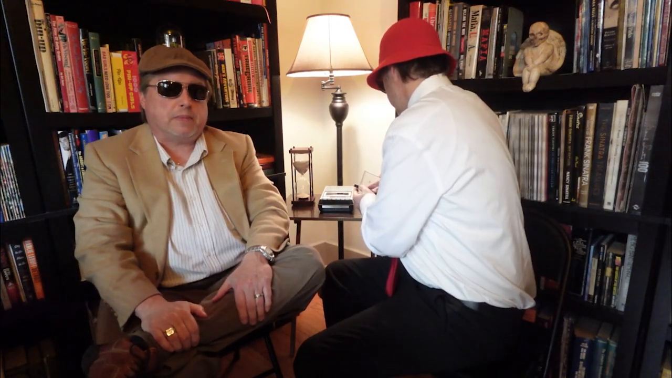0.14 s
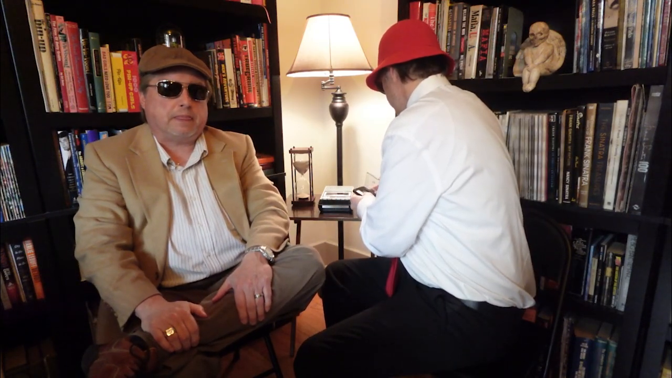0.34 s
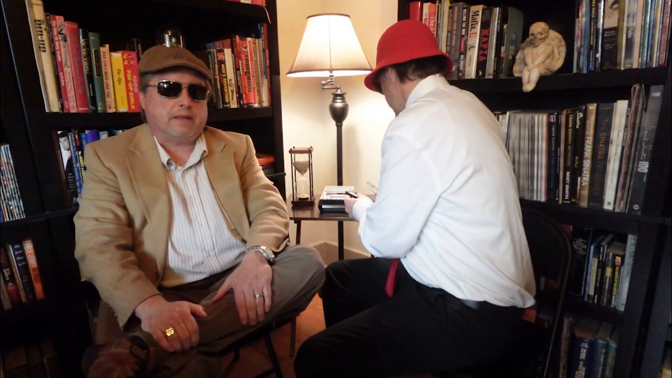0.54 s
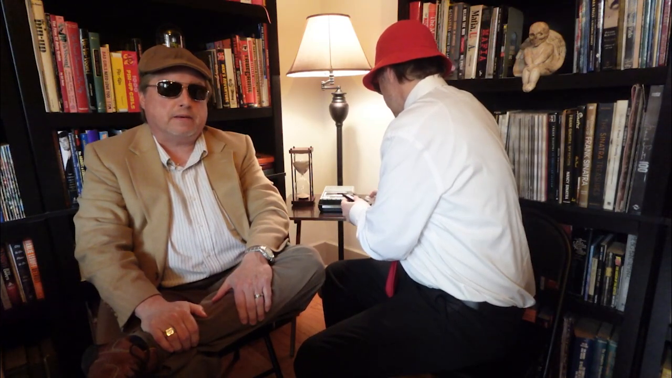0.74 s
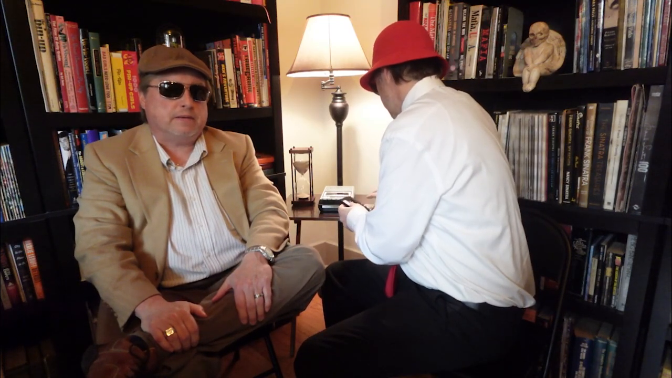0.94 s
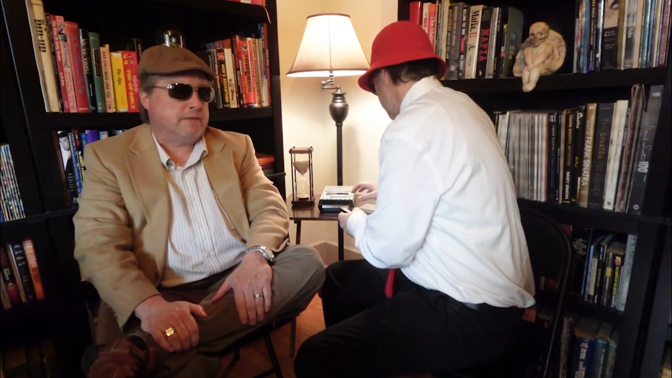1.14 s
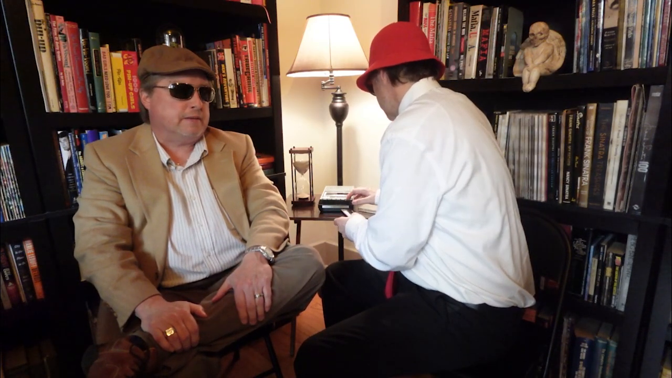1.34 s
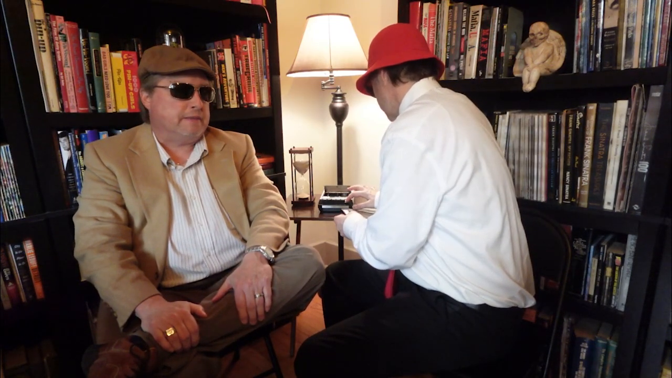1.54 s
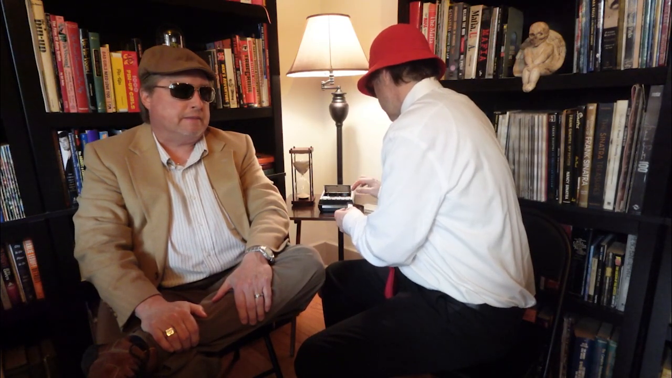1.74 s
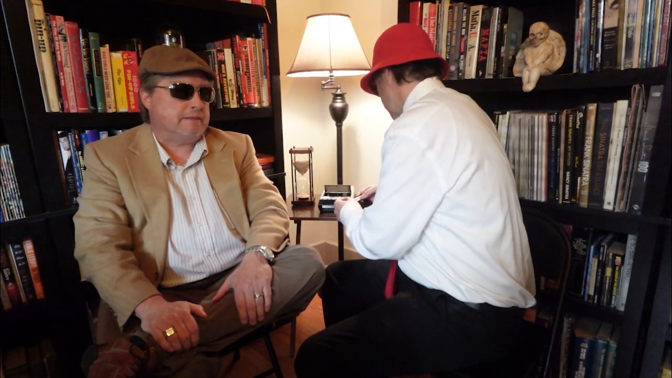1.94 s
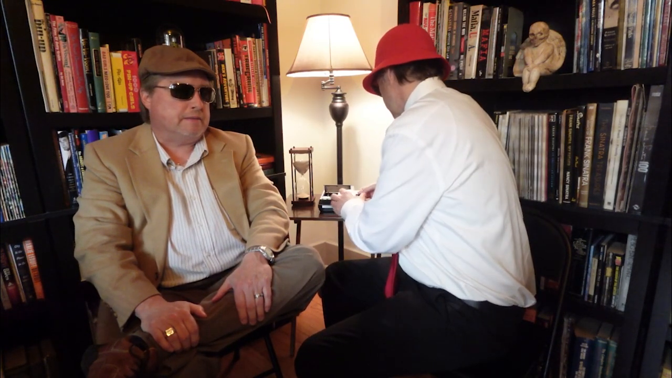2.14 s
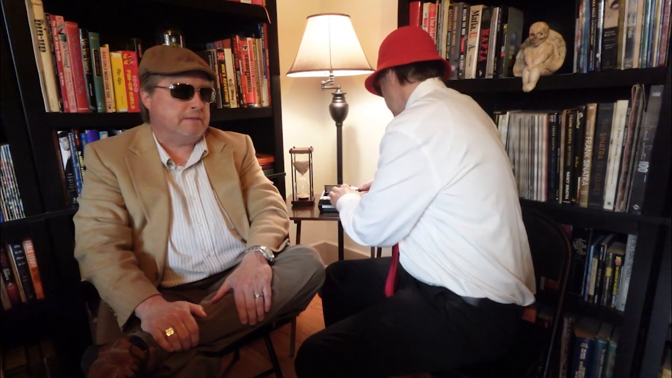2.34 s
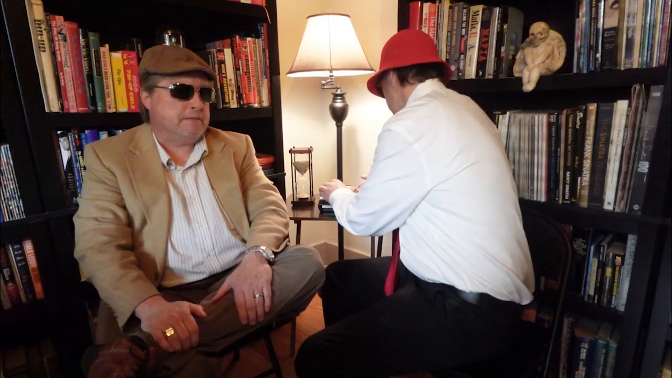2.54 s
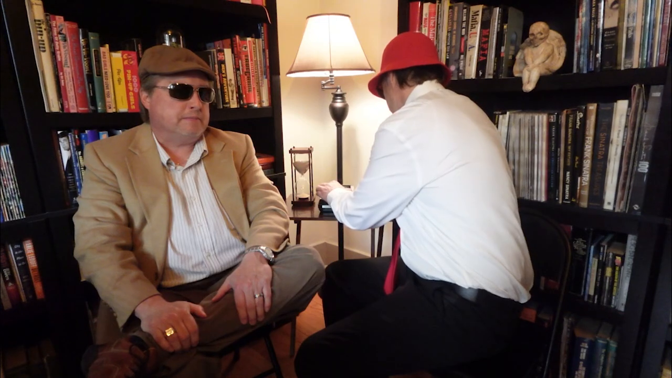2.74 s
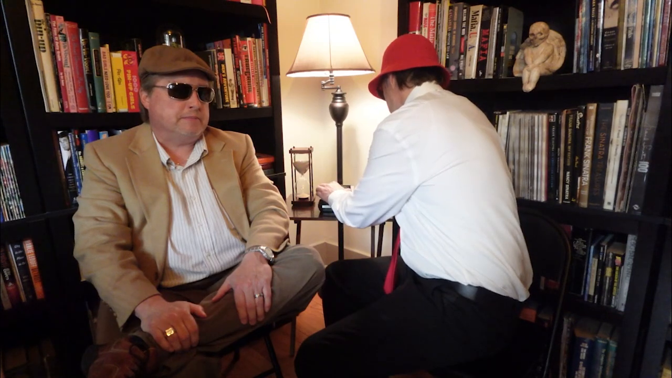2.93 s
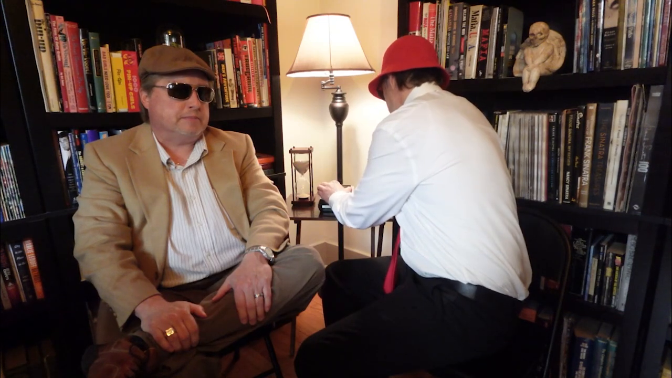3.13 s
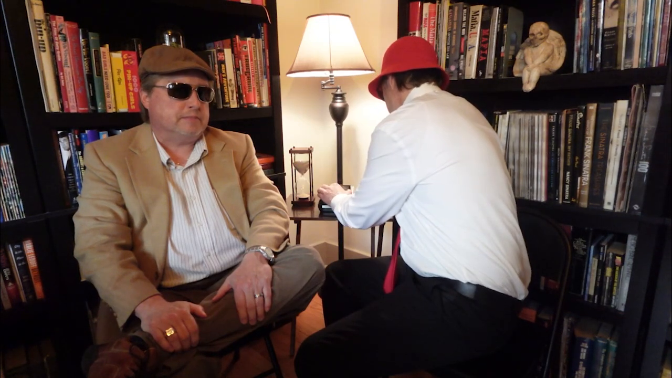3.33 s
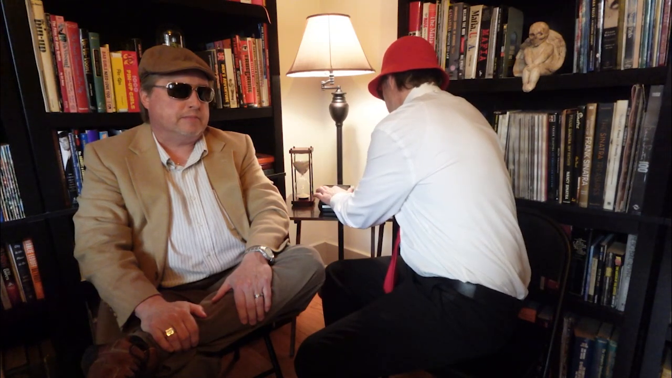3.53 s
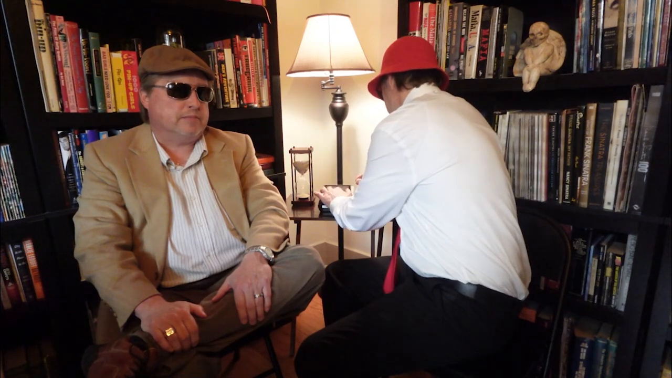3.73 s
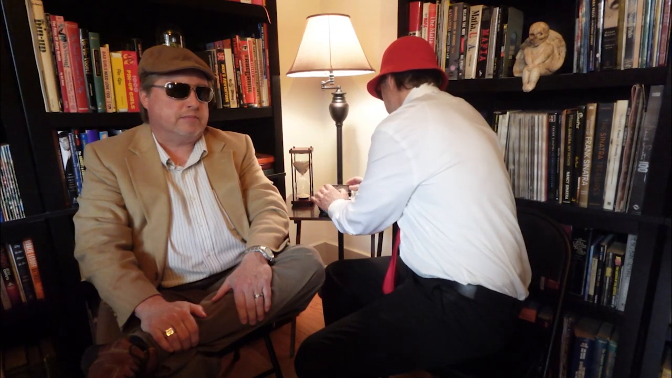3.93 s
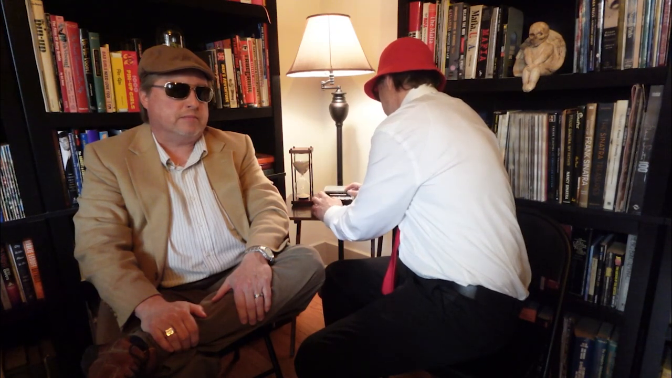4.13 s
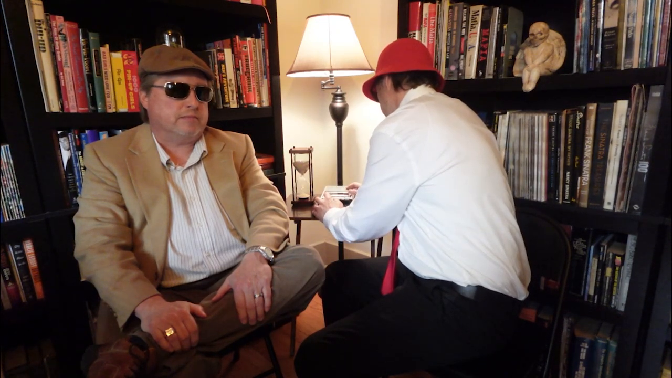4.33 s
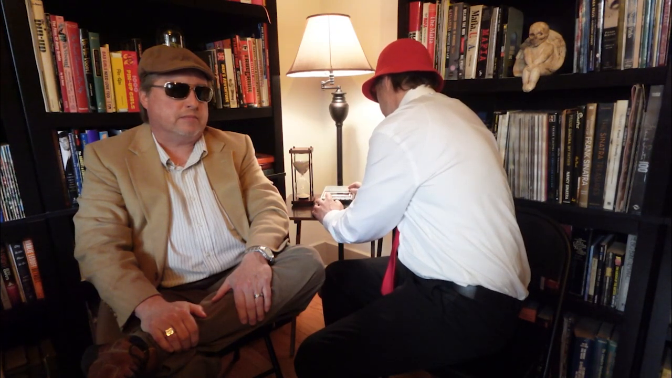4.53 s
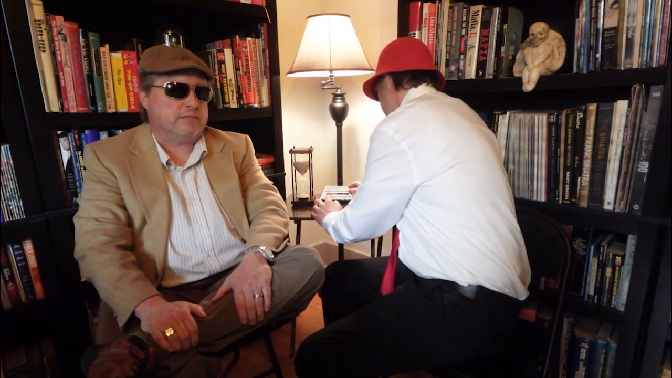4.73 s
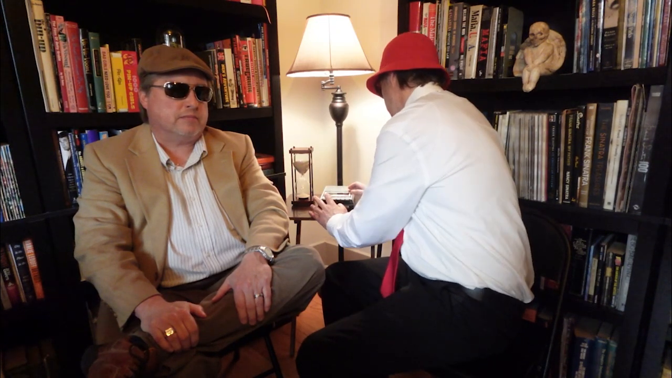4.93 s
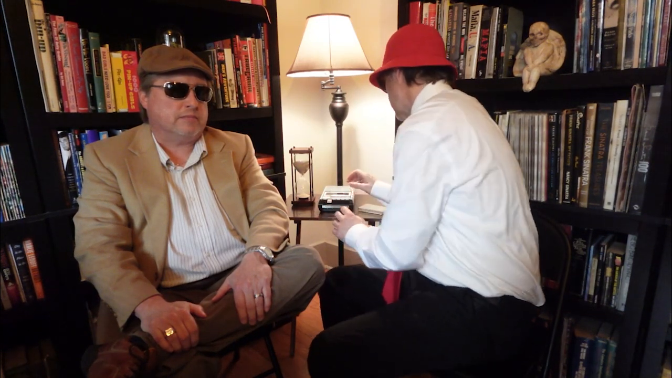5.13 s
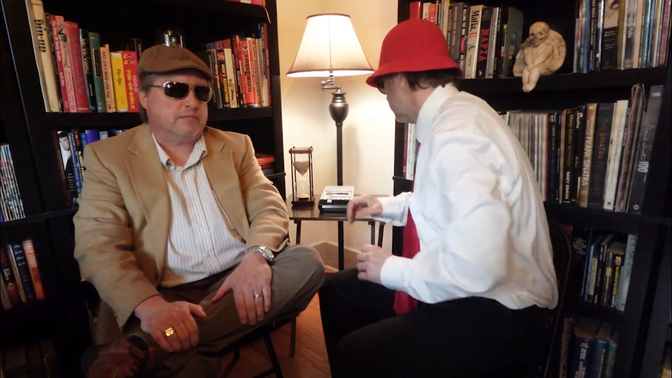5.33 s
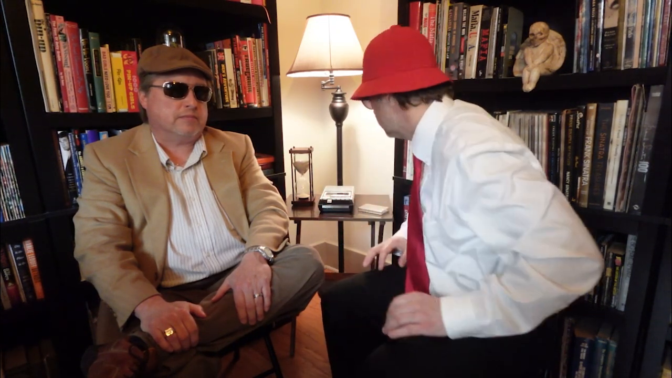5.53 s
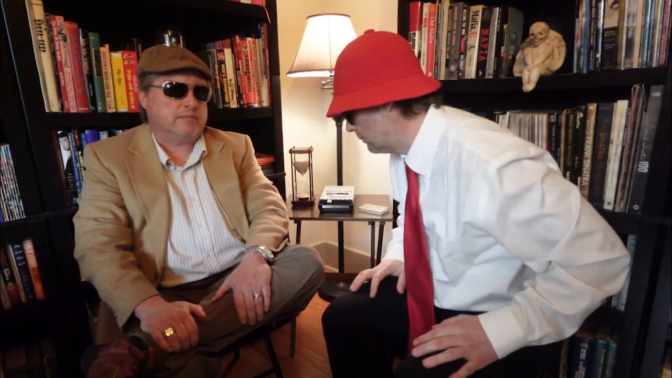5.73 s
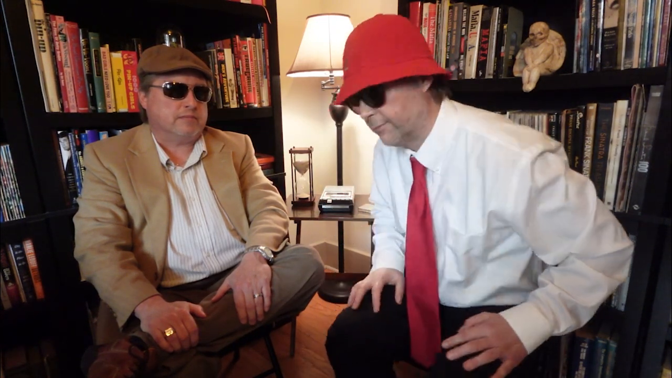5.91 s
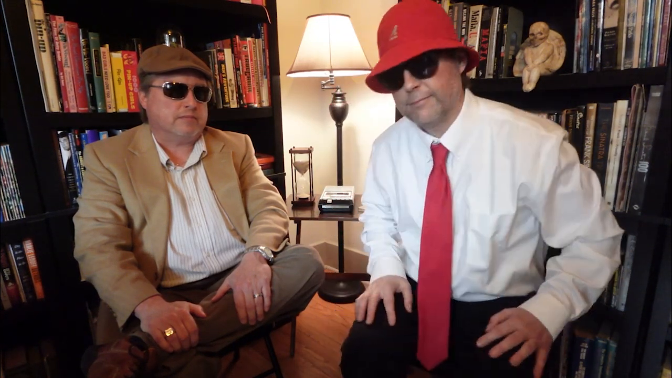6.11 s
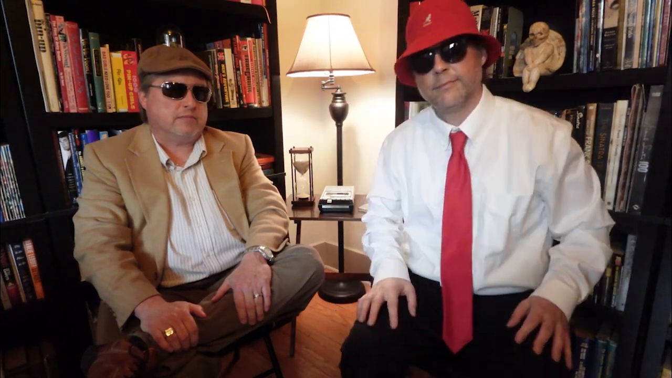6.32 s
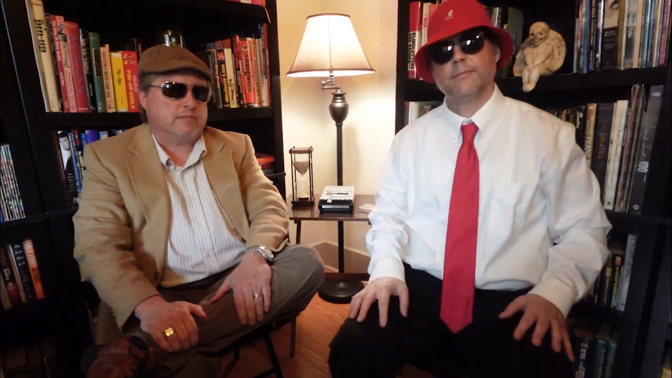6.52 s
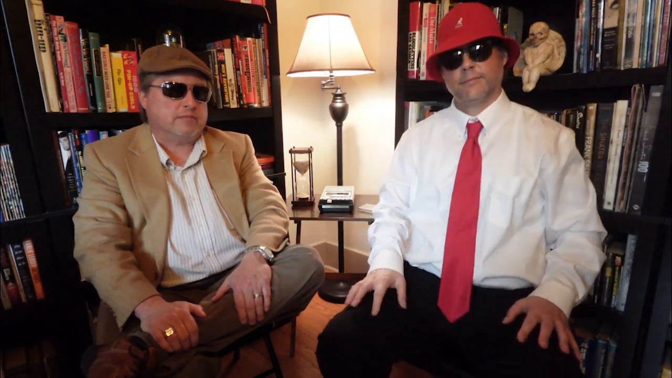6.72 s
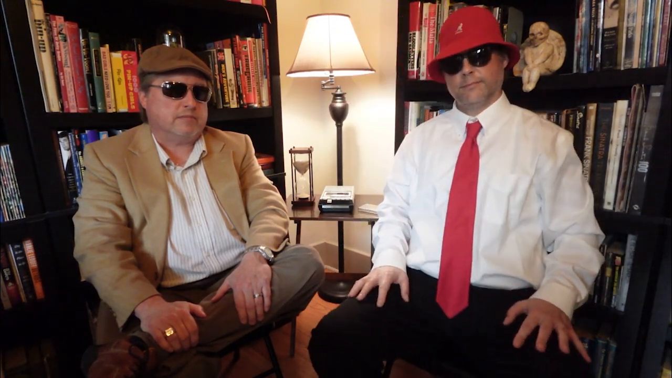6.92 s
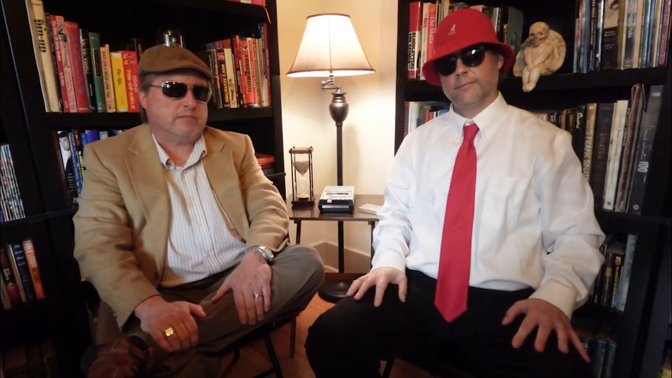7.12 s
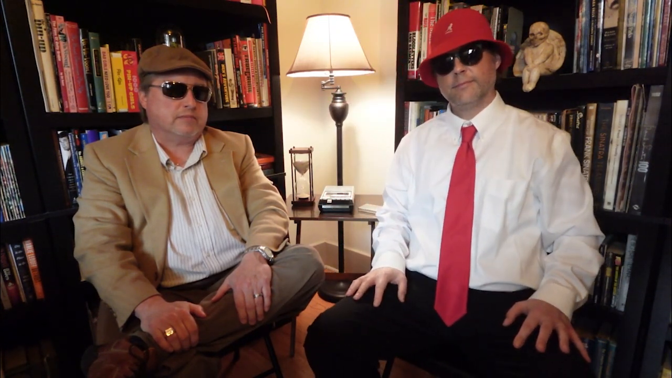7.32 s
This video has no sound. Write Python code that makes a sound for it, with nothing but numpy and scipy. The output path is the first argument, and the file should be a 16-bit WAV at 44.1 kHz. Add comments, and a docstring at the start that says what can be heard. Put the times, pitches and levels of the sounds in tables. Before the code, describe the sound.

A small furnished room with faint steady hiss and short reflections, heard closely in stereo. From 0 to 0.6 s a hard plastic cassette box gives light, irregular clicks and rattles, growing louder, with a sharp clack at 0.83 and another click at 1.0. At about 1.6 s the recorder's door opens with a loud, hollow double clack, and a bright tick follows at 1.74. From 1.9 to 3.4 s there are only faint taps and soft sleeve rubbing. Around 3.45 to 3.6 s the cassette scrapes briefly and clatters into place; the door snaps at 3.8, and a key clunks in a tight cluster at 4.2 to 4.3. Small clicks follow at 4.7 to 4.9. A dull low table bump lands at 5.07, with a fainter one at 5.2. The chair creaks raspily at 5.6 to 6.0 and 6.4 to 6.9 s amid shirt rustle, strongest near 6.7, then settles into near silence.

```python
"""In a small room lined with books, a man takes a cassette from its plastic box, opens a portable recorder,
slides the tape in, snaps the door shut and presses a key: small contacts make the plastic parts ring.
He bumps the table as he turns round, which rings its low modes; his chair creaks in two bouts of sticking
and slipping. Shaped noise gives the rustle of his shirt, loudest near the end, and the faint hiss of the room."""
import sys
import numpy as np
from scipy import signal
from scipy.fft import rfft, irfft, next_fast_len
from scipy.io import wavfile
from scipy.ndimage import uniform_filter1d, minimum_filter1d, map_coordinates

SR = 44100
rng = np.random.default_rng(int(sys.argv[2]) if len(sys.argv) > 2 else 0)


def unload_wav(signal):
    """Save mono or channel-first audio to the path in sys.argv[1] as 16-bit WAV at rate SR, clipped to [-1, 1]."""
    wavfile.write(
        sys.argv[1],
        SR,
        np.round(np.clip(np.atleast_2d(signal).T, -1, 1) * 32767).astype(np.int16),
    )


N = 324822
SIZE = 16384  # samples in the transform that describes a ringing body
HZ = np.fft.rfftfreq(SIZE, 1 / SR)
TIME = np.arange(N) / SR  # seconds


def box():
    """The hard plastic box of the cassette clicks and rattles as it is opened."""
    # Touches of the box. Each row: start in seconds, length of rattle in seconds, level in dB,
    # knock into the table in dB, hardness in dB, main ring in Hz.
    contacts = [(.001, .009, -3, -31, 0.5, 1090), (.177, 0.00099, -15, -37, 9.5, 5500),
                (.221, 0.0063, -9.5, -33, 2.5, 1310), (.3, 0.0016, -8.5, -32, 1, 1310),
                (.324, 0.027, 0.5, -22, -7, 1320), (.367, 0.00096, 5, -38, 4, 1350),
                (.385, 0.042, 4.5, -17, 2, 1550), (.502, 0.033, 9.5, -41, 5.5, 4730),
                (.531, 0.023, 10, -22, 10.5, 2620), (.577, 0.0084, 15.5, -30.5, -.5, 1390),
                (.643, .006, 15, -16.5, 2.5, 790), (.8298, 0.0022, 26, -21.5, -4.5, 1097),
                (1.017, .005, 14, -9, 1, 927), (1.373, .001, -20, -19, 13, 4060),
                (1.417, 0.0038, -3, -14, 0.5, 2500)]
    # Tones the box rings with. Each row: pitch in Hz, width in Hz, lift in dB.
    modes = [(850, 90, 4), (1198, 60, 7), (1422, 90, 8), (1810, 90, 5), (2778, 90, 6), (3290, 70, 6),
             (4116, 220, 4), (6700, 300, 5)]
    sound = plastic(contacts, modes, direct_db=-6.5, bass_db=-28, fizz_db=-12, ring_db=9.5)
    return panned(sound, left_db=-1.1)


def recorder():
    """The recorder's plastic shell rings as its door opens, snaps shut and a key is pressed."""
    # Touches of the recorder. Each row: start in seconds, length of rattle in seconds, level in dB,
    # knock into the table in dB, hardness in dB, main ring in Hz.
    contacts = [(1.5745, .007, 15, -13, -2.5, 930), (1.581, 0.027, 23, -12, -4, 987),
                (1.612, 0.033, 17.5, -4.5, -7.5, 620), (1.723, 0.017, -1, 5.5, 9.5, 8640),
                (1.7405, 0.00059, 12, -15.5, 3.5, 10500), (3.81, .002, 17.5, -4, 1, 1720),
                (4.218, .005, 18, -18, -6, 1350), (4.224, 0.00063, 5.5, -3, 8.5, 1570),
                (4.245, 0.032, 16, -6, 2, 1200), (4.286, .032, 14.5, -2.5, 0, 410),
                (4.712, 0.014, 2.5, -10, 4.5, 4070), (4.743, 0.0069, 7, -7, 1, 8400),
                (4.825, 0.04, -2, 0.5, -6, 1360), (4.919, 0.0011, -1.5, -14, 0, 7960)]
    # Tones the shell rings with. Each row: pitch in Hz, width in Hz, lift in dB.
    modes = [(612, 60, 8), (940, 55, 7), (1118, 65, 7), (1598, 70, 7), (2520, 100, 4), (3197, 90, 5),
             (3883, 90, 5), (4516, 70, 5), (5860, 180, 4)]
    sound = plastic(contacts, modes, direct_db=-7.5, bass_db=-29.5, fizz_db=-4.5, ring_db=7.5)
    return panned(sound, left_db=-.8)


def cassette():
    """The cassette rings when it is handled and put in, and under faint taps of the fingertips."""
    # Touches of the cassette. Each row: start in seconds, length of rattle in seconds, level in dB,
    # knock into the table in dB, hardness in dB, main ring in Hz.
    contacts = [(1.925, 0.0092, -5.5, -4, -21, 836), (1.967, 0.00056, 6.5, -24, -1, 1137),
                (2.184, .001, -23.5, -24, 18.5, 2640), (2.225, 0.014, -5.5, -35, -7, 1370),
                (2.384, .0007, -6.5, -7, -7, 2140), (2.513, .002, -3.5, -27, -8.5, 1810),
                (2.638, 0.0021, -3.5, -7.5, -6, 2010), (2.986, .007, -6.5, -3.5, 5, 10400),
                (3.226, 0.0033, -17.5, -2, 0.5, 5150), (3.358, 0.0018, -12.5, -8, -1.5, 4300),
                (3.395, 0.0013, -1.5, -13, -4, 2180), (3.474, .022, 12.5, -25, -4.5, 2120),
                (3.555, 0.013, 18, -16, -3, 2500), (3.567, .013, 21, -16, -3.5, 2030),
                (3.59, 0.023, 14.5, -8.5, -6.5, 847), (3.69, .008, -0.5, -2.5, -12, 1530)]
    # Tones the cassette rings with. Each row: pitch in Hz, width in Hz, lift in dB.
    modes = [(1575, 80, 7), (1885, 110, 7), (2513, 100, 6), (3110, 150, 4), (4920, 130, 4), (9350, 500, 10)]
    touches = contacts + fumbling(count=8)
    sound = plastic(touches, modes, direct_db=-5.5, bass_db=-22, fizz_db=-9.0, ring_db=9)
    return panned(sound, left_db=-0.9)


def fumbling(count):
    """Faint fingertip contacts at random moments, each a little different."""
    # When taps may come: earliest in seconds, latest in seconds.
    span = (0.042, 4.3)
    length, knock_db, scatter_db = .003, -4, 2.5  # length in seconds
    typical_db, typical_hardness_db, typical_ring_hz = -17, -10, 900
    times = rng.uniform(*span, count)
    chance = rng.standard_normal((count, 3))
    taps = []
    for s, (force, angle, place) in zip(times, chance):
        level_db = typical_db + scatter_db * force
        hardness_db = typical_hardness_db + scatter_db * angle
        ring_hz = typical_ring_hz * np.exp(.2 * place)
        taps.append((s, length, level_db, knock_db, hardness_db, ring_hz))
    return taps


def plastic(contacts, modes, direct_db, bass_db, fizz_db, ring_db):
    """Each contact rings the part's modes, one of them most, depending on where it is touched."""
    # A hard contact is short, so it reaches higher: dB of fizz at 9 kHz for each dB of hardness.
    fizz_per_hardness = 1.36
    out = np.zeros((2, N))
    for s, length, db, knock_db, hard_db, ring_hz in contacts:
        top_db = fizz_db + fizz_per_hardness * hard_db
        low_blow = [(30, knock_db + bass_db - 2), (90, knock_db + bass_db), (210, knock_db + bass_db / 3)]
        middle_blow = [(450, knock_db), (900, knock_db / 8), (1500, 0.016)]
        high_blow = [(3600, hard_db), (9000, top_db), (16000, top_db - 10.5)]
        blow = low_blow + middle_blow + high_blow
        main_ring = (ring_hz, .12 * ring_hz, ring_db)
        body_db = db + along(blow, HZ) + lifted([*modes, main_ring])
        sound = rattle(length, body_db, spiky_db=4.5, grains_per_s=2600, grip_db=3.5)
        add(out, s, in_room(sound, direct_db))
    return out


def rattle(length, body_db, spiky_db, grains_per_s=2000, grip_db=0):
    """Tiny irregular catches ring a body while the parts slide; grip_db makes those halfway stronger."""
    count = 1 + int(length * grains_per_s)
    at = np.append(0, rng.uniform(0, 1, count - 1))  # share of the length
    sizes_db = spiky_db * rng.standard_normal(count) + grip_db * np.sin(np.pi * at)
    catches = rng.choice([-1, 1], count) * amp(sizes_db)
    force = np.bincount((at * length * SR).astype(int), catches)
    # The catches set the timing; the body alone sets the broad colour and the energy.
    power = np.abs(uniform_filter1d(np.abs(rfft(force, SIZE)) ** 2, size=250))
    return signal.fftconvolve(force, ringing(body_db - 10 * np.log10(power + 1e-9)))


def slide():
    """The cassette scrapes along the guide rail, which sings under the friction."""
    # Pushes into the slot. Each row: fastest moment in seconds, rise in seconds, fall in seconds, level in dB.
    pushes = [(3.44, 0.022, 0.079, -34), (3.495, 0.021, 0.014, -32)]
    # Tones of the guide rail. Each row: pitch in Hz, width in Hz, lift in dB.
    rail_modes = [(2090, 320, 15), (2460, 170, 11)]
    # Broad colour of the scrape. Each row: frequency in Hz, relative level in dB.
    rail = [(200, -35), (700, -7), (2500, 2), (5000, -7.5), (16000, -30)]
    friction = rng.standard_normal(N) * amp(5.6 * rng.standard_normal(N))
    body = ringing(along(rail, HZ) + lifted(rail_modes))
    scrape = unit(signal.fftconvolve(friction, body)[:N])
    return in_room(strength(pushes) * scrape, direct_db=0)[:, :N]


def table():
    """A soft bump rings only the low modes of the little table."""
    # Bumps on the table. Each row: start in seconds, level in dB.
    bumps = [(5.0729, 12.5), (5.222, -7.5)]
    # What a soft blow puts in. Each row: frequency in Hz, level in dB.
    soft_blow = [(60, -52), (190, -26), (320, -3.5), (700, 2), (1150, -10), (2500, -13.5), (6000, -58)]
    # Tones of the table. Each row: pitch in Hz, width in Hz, lift in dB.
    modes = [(384, 50, 11), (462, 17, 6.3), (628, 81, 3.7)]
    out = np.zeros((2, N))
    knock = ringing(along(soft_blow, HZ) + lifted(modes))
    for s, db in bumps:
        add(out, s, in_room(amp(db) * knock, direct_db=-14.0))
    return panned(out, left_db=-0.5)


def chair():
    """A loaded joint sticks and slips as he shifts; each slip is a short scrape into the frame."""
    # Creaks. Each row: start in seconds, length in seconds, basic level of a slip in dB,
    # slips per second halfway through, main ring in Hz.
    creaks = [(5.6047, 0.061, 10, 138, 1730), (5.7183, .16, 4.5, 80, 2400), (5.9137, 0.081, 7, 61, 2920),
              (6.0165, 0.013, 6.5, 50, 2320), (6.387, .17, -7, 38, 2398), (6.575, .105, 4, 47, 2290),
              (6.692, 0.081, 2, 120, 2080), (6.786, .11, 3.5, 72, 1750)]
    # Broad colour of a slip. Each row: frequency in Hz, level in dB.
    slip_colour = [(30, -55), (100, -42), (300, -26), (600, -11), (1200, -8.5), (2500, -6.5), (3400, -12.5),
                   (9000, -24), (16000, -47)]
    # Tones of the frame. Each row: pitch in Hz, width in Hz, lift in dB.
    modes = [(1700, 170, 7), (2230, 180, 4), (2570, 220, 6), (4250, 250, 8)]
    breakaway_db, breakaway_s = 1, .012  # the first slips are the hardest
    scatter_db, ring_db = 0.9, 5  # spread of slip strength; lift of the main ring
    creak = np.zeros(N)
    for s, length, db, halfway_rate, ring_hz in creaks:
        main_ring = (ring_hz, .2 * ring_hz, ring_db)
        frame_db = along(slip_colour, HZ) + lifted([*modes, main_ring])
        for delay in slip_times(length, halfway_rate):
            slip = rattle(.005, frame_db, spiky_db=2, grains_per_s=4000)
            extra_db = breakaway_db * np.exp(-delay / breakaway_s)
            slip_db = db + extra_db + scatter_db * rng.standard_normal()
            add(creak, s + delay, amp(slip_db) * slip)
    return in_room(creak, direct_db=7.5)[:, :N]  # the chair is close: mostly direct sound


def slip_times(length, halfway_rate):
    """Seconds into a creak at which the joint lets go; the rate glides from 50 a second to halfway_rate and back."""
    end_rate = 50  # slips per second as the joint starts and stops turning
    jitter = .11  # share of the gap between slips
    t = np.arange(int(length * SR)) / SR
    rate = end_rate + (halfway_rate - end_rate) * np.sin(np.pi * t / length) ** 2
    turns = np.cumsum(rate) / SR
    slips = np.arange(np.ceil(turns[-1]))
    shifts = jitter * rng.standard_normal(len(slips)) * (slips > 0)  # the first slip stays in place
    return np.interp(slips + shifts, turns, t)


def cloth():
    """Every movement rubs sleeves and hands and swishes the shirt; the seat takes the turning body."""
    # Movements of his arms and body. Each row: fastest moment in seconds, rise in seconds,
    # fall in seconds, rubbing in dB, swish in dB.
    moves = [(2.28, 0.11, 0.13, -58, -52), (2.5, 2.8, 1.9, -59, -58.5), (2.622, 0.21, 0.11, -50.5, -48.5),
             (5.33, .2, 0.85, -46, -42), (5.78, 0.074, 0.087, -36, -51), (6.042, 0.22, 0.097, -45.5, -38.5),
             (6.275, 0.029, 0.22, -45.5, -55), (6.715, 0.022, 0.051, -34.5, -42),
             (6.73, 0.2, .19, -39, -44.5), (7.28, 0.0067, 0.029, -51.5, -78)]
    # The seat taking his weight. Each row: peak in seconds, rise in seconds, fall in seconds, level in dB.
    weight = [(5.93, .1, .07, -62), (6.027, .008, .018, -49.5), (6.63, .12, .14, -57.5)]
    # Colours of the three noises. Each row: frequency in Hz, relative level in dB.
    rub_colour = [(150, -33), (350, -16.5), (650, -2.5), (1600, 2.5), (3000, -6), (5000, -18),
                  (10000, -28.5), (16000, -55)]
    swish_colour = [(800, -23), (2500, 4), (4000, 2.5), (6000, -0.5), (9000, -7), (15500, -12)]
    seat_colour = [(25, -54), (70, -32), (130, -10), (220, 0), (340, -4), (600, -14), (1500, -40)]
    fidget_rub_db, fidget_seat_db = -60.5, -79.5  # he is never quite still
    rubbing = np.hypot(amp(fidget_rub_db), strength((*shape, db) for *shape, db, _ in moves))
    swishing = strength((*shape, db) for *shape, _, db in moves)
    pressing = np.hypot(amp(fidget_seat_db), strength(weight))
    rub = rubbing * rush(rub_colour, grain_db=1.5, grain_rate=240, wide_db=8.5)
    swish = swishing * rush(swish_colour, grain_db=0.5, grain_rate=440, wide_db=-1.0)
    seat = pressing * rush(seat_colour, grain_db=2, grain_rate=100, wide_db=4)
    return rub + swish + seat


def swell(s, rise, fall):
    """The speed of one movement: a bell that peaks at time s."""
    away = (TIME - s) / np.where(TIME < s, rise, fall)
    return np.exp(-np.minimum(np.abs(away), 10) ** 2 / 2)


def strength(swells):
    """The joint amplitude of overlapping movements (s, rise s, fall s, dB); their powers add."""
    return np.sqrt(sum(amp(2 * db) * swell(s, rise, fall) ** 2 for s, rise, fall, db in swells))


def air():
    """The almost steady faint hiss of the room: noise with a very slight flutter."""
    # Colour of the hiss. Each row: frequency in Hz, relative level in dB.
    colour = [(25, -60), (100, -43), (200, -22.5), (450, -12.5), (750, -1), (1300, -6), (2500, -16),
              (5000, -8.5), (15500, -18)]
    return amp(-59) * rush(colour, grain_db=.3, grain_rate=8, wide_db=3)


def rush(spectrum, grain_db, grain_rate, wide_db):
    """Diffuse noise of rms 1 whose strength flutters at random, grain_rate random levels a second."""
    knots = rng.standard_normal(int(N * grain_rate / SR) + 4)
    flutter_db = grain_db * map_coordinates(knots, [TIME * grain_rate])
    pair = rng.standard_normal((2, N)) * amp(flutter_db)
    coloured = filtered(pair, lambda hz: amp(along(spectrum, hz)))
    return unit(diffuse(coloured, wide_db))


def in_room(x, direct_db, build=0.0021, early_db=4, early_life=0.03):
    """x heard directly, by the near shelves, and by a fresh tail of reflections that dies away."""
    # How fast reflections fade. Each row: frequency in Hz, time to fade by 60 dB in seconds.
    fade_times = [(100, 0.27), (260, 0.5), (700, 0.37), (1840, 0.29), (4850, 0.31), (12800, 0.28)]
    hz, t, z = signal.stft(rng.standard_normal((2, SR // 2)), SR, nperseg=256)
    fade = amp(-60 * t / along(fade_times, hz)[:, None])
    tail = signal.istft(z * fade, SR, nperseg=256)[1]
    age = np.arange(tail.shape[1]) / SR
    early = amp(early_db * np.exp(-(age / early_life) ** 2))
    tail = tail * (1 - np.exp(-age / build)) * early
    paths = diffuse(tail / np.linalg.norm(tail[0]))
    paths[:, 0] += amp(direct_db)  # the direct sound, against the tail
    return signal.fftconvolve(x[None], paths, axes=1) / np.hypot(1, amp(direct_db))


def diffuse(pair, wide_db=0):
    """Two unrelated signals to left and right, near mono in the bass."""
    # Basic width of diffuse sound. Each row: frequency in Hz, side against middle in dB.
    width = [(100, -21), (500, -20), (1200, -18.5), (2500, -13.5), (5000, -9.5), (13000, -9.5)]
    side = filtered(pair[1], lambda hz: amp(along(width, hz) + wide_db))
    return np.array([pair[0] + side, pair[0] - side])


def panned(x, left_db):
    """x louder on the left by left_db; a negative value leans right."""
    return x * amp([[left_db / 2], [-left_db / 2]])


def lifted(modes):
    """dB over HZ that these resonances (Hz, width Hz, lift dB) add."""
    return sum(lift / (1 + (2 * (HZ - hz) / width) ** 2) for hz, width, lift in modes)


def ringing(gain_db):
    """The sound of a body struck once, at most 0.1 s, from its gain over HZ; it starts at the blow."""
    # Folding the cepstrum forward makes the response causal (minimum phase).
    cepstrum = irfft(np.log(amp(gain_db)))
    cepstrum[1:SIZE // 2] *= 2
    cepstrum[SIZE // 2 + 1:] = 0
    return irfft(np.exp(rfft(cepstrum)))[:SR // 10]


def filtered(x, response):
    """x times a gain of frequency, with no shift in time."""
    size = next_fast_len(x.shape[-1] + SIZE)
    spectrum = rfft(x, size) * response(np.fft.rfftfreq(size, 1 / SR))
    return irfft(spectrum, size)[..., :x.shape[-1]]


def along(points, hz):
    """(Hz, value) points read on a log axis."""
    f, v = np.transpose(points)
    return np.interp(np.log(hz + 1), np.log(f + 1), v)


def add(track, s, sound):
    """Mix a sound into the track at time s."""
    start = max(0, round(s * SR))
    track[..., start:start + sound.shape[-1]] += sound[..., :N - start]


def amp(db):
    """Decibels to gain."""
    return 10 ** (np.asarray(db) / 20)


def unit(x):
    """x at rms 1."""
    return x / np.sqrt(np.mean(x ** 2) + 1e-20)


def scene():
    """The recorder stands near the middle, the man and his chair a little to the right."""
    tape_work = box() + cassette() + slide() + recorder()
    man = panned(cloth() + chair(), left_db=-1.5)
    return tape_work + table() + man + air()


def record(dry):
    """A limiter ducks the tallest peaks; nothing is kept above the band limit."""
    ceiling, top_hz = .64, 15950  # full scale is 1
    needed = np.minimum(1, ceiling / (np.abs(dry).max(axis=0) + 1e-9))
    held = minimum_filter1d(needed, size=441)  # a window of 10 ms
    gain = uniform_filter1d(held, size=331)
    return filtered(dry * gain, lambda hz: hz < top_hz)


dry = scene()
out = record(dry)
unload_wav(out)
```